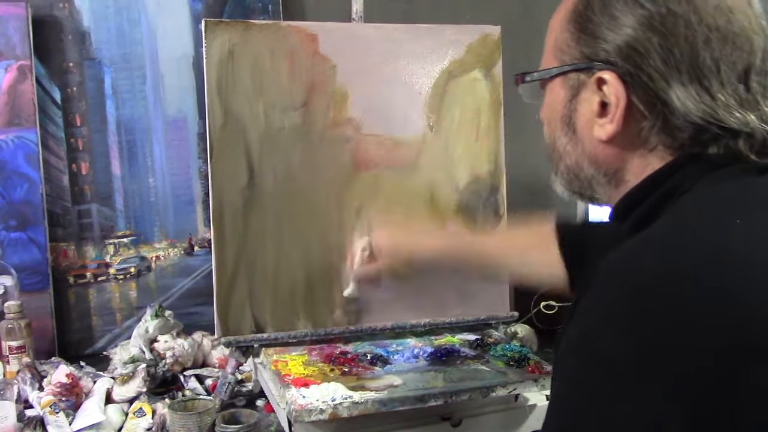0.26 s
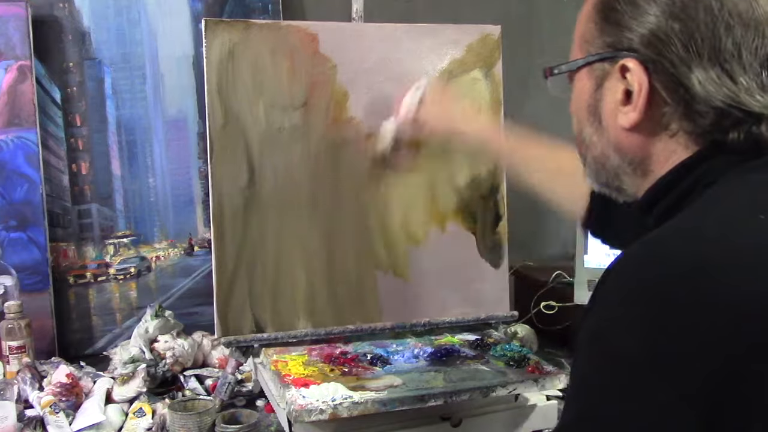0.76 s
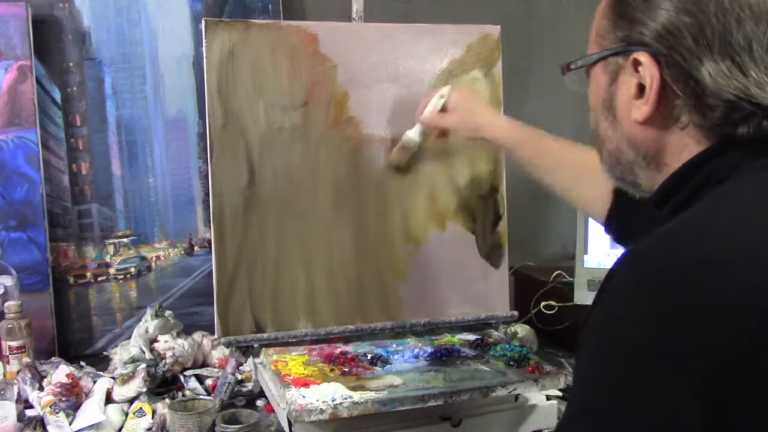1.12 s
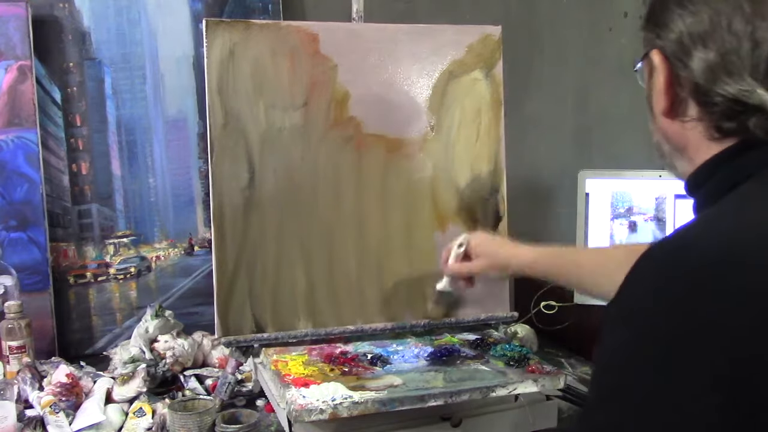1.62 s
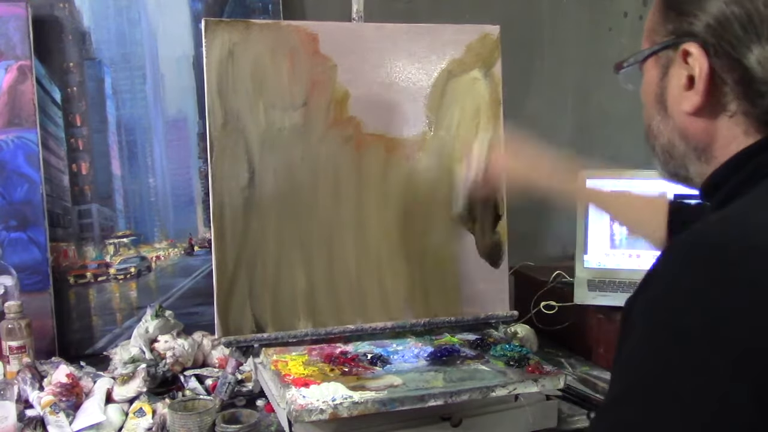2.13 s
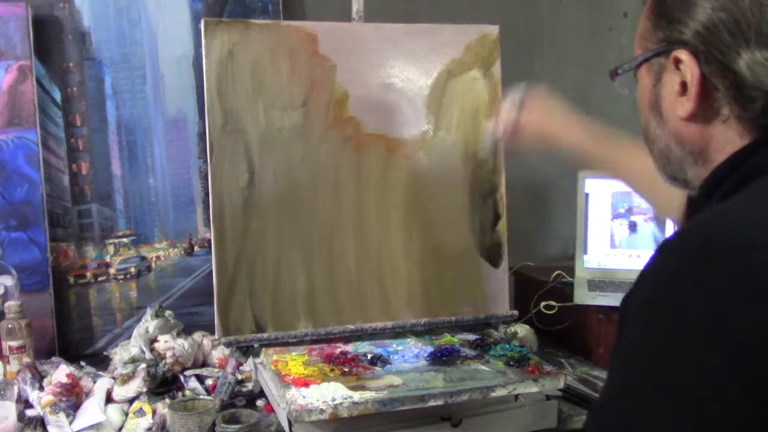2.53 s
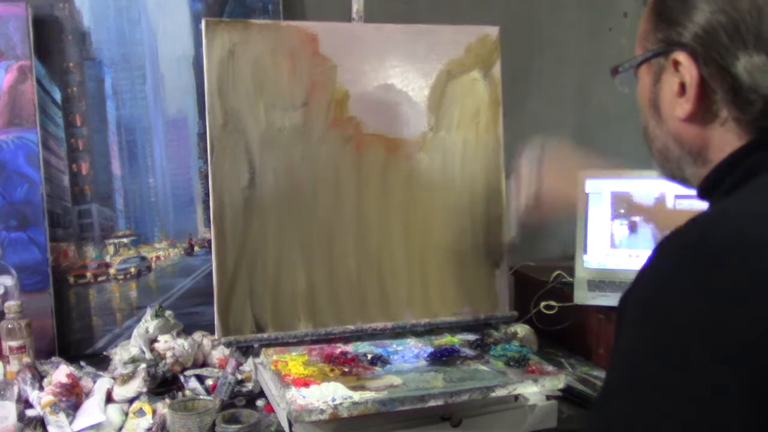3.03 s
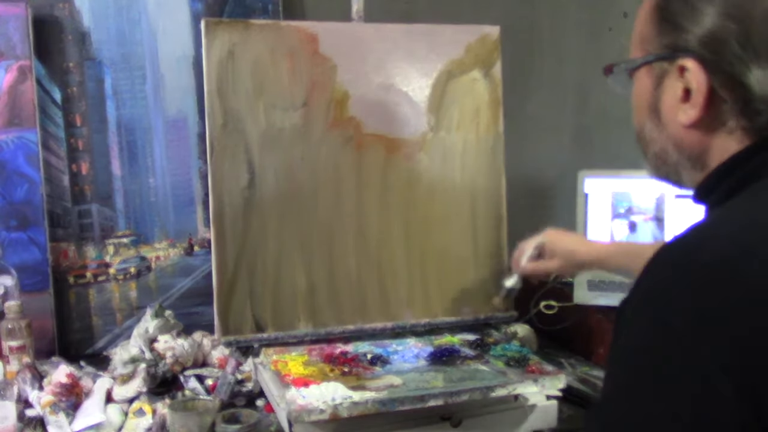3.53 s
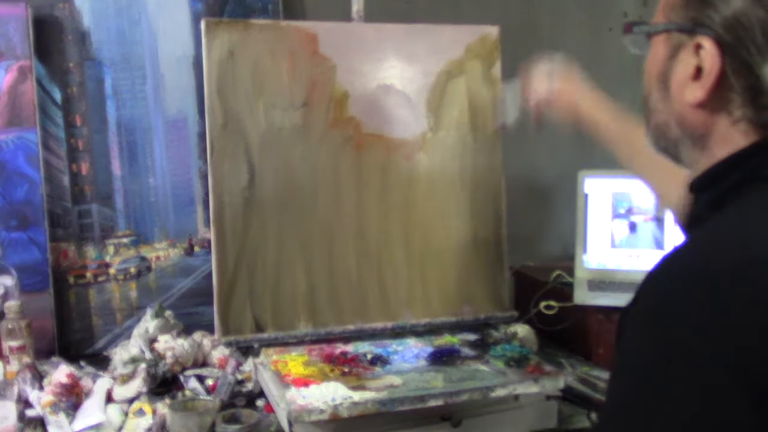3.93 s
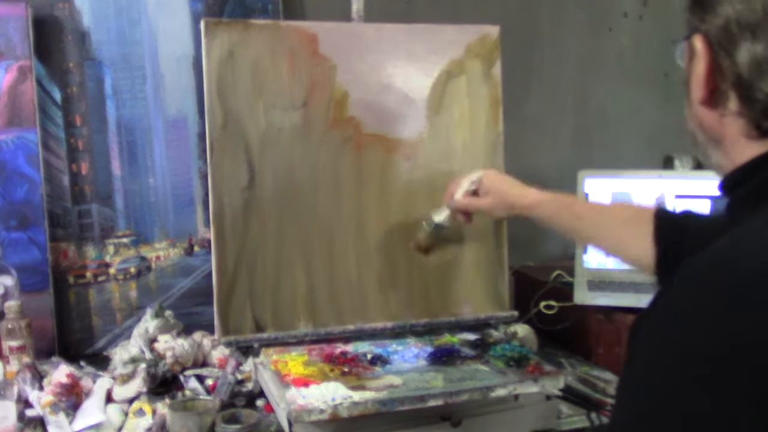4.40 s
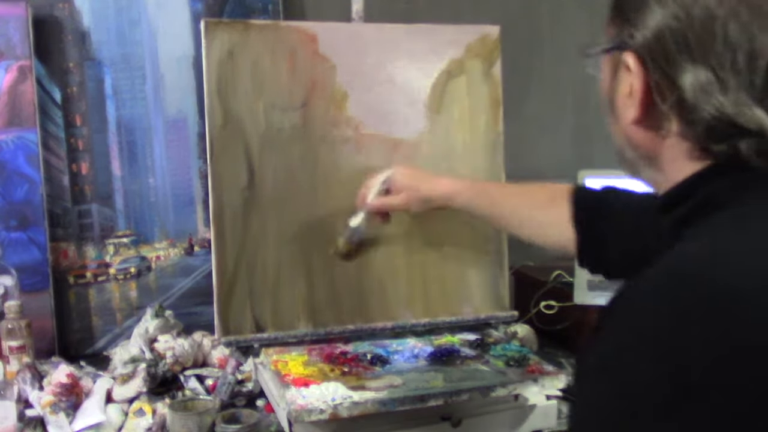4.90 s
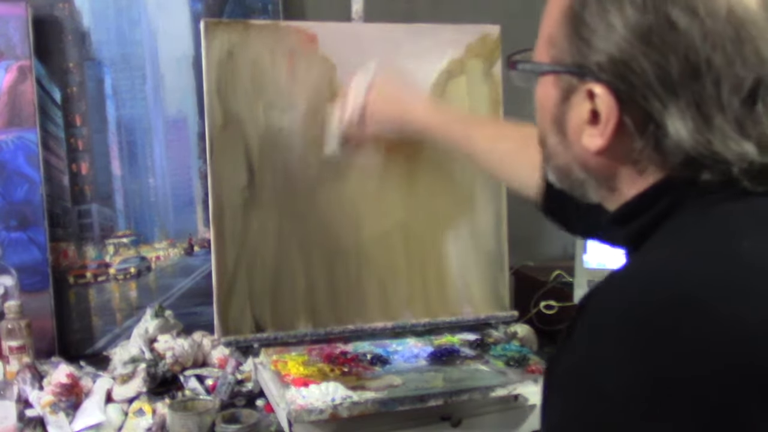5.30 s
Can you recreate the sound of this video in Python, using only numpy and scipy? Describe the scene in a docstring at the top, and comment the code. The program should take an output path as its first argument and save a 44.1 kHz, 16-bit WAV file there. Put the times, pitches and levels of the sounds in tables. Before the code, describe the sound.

Close in a quiet studio, a wide bristle brush scrubs stretched canvas, about six swishing strokes a second. Each stroke hisses and scrapes with a faint whine over hollow canvas drumming. Wooden knocks cluster near two and three seconds; then the scrubbing turns drier, lighter and softer to the end.

```python
"""In a studio, close microphones, nearly mono: a wide bristle brush scrubs thick paint on a stretched canvas.
From the start it goes up and down about six strokes a second: bristle slips hiss, scrape and fizz, the weave
whines with the speed of each stroke, the canvas drums underneath, and the easel rocks softly at the turns.
The ferrule knocks canvas against stretcher bar, hardest near 2 s and again near 3.1 s, as rung frame modes.
From about 2.8 s the scrape turns drier, then the strokes ease to a lighter scrub with one late knock."""
import sys
import numpy as np
from scipy import signal
from scipy.io import wavfile
from scipy.ndimage import uniform_filter1d

SR = 44100
rng = np.random.default_rng(int(sys.argv[2]) if len(sys.argv) > 2 else 0)


def unload_audio(sound):
    """Save the sound as a 16-bit wav file, at the path given as the first command line argument."""
    columns = np.transpose(np.atleast_2d(sound))
    # keep every value between -1 and 1, then stretch to whole-number steps
    steps = np.round(np.clip(columns, -1, 1) * 32767)
    wavfile.write(sys.argv[1], SR, steps.astype(np.int16))


N = 244755  # samples


def gain_of(db):
    """Decibels to amplitude."""
    return 10 ** (np.asarray(db) / 20)


def evened(x):
    """Scales to rms 1."""
    return x / np.sqrt(np.mean(x ** 2) + 1e-20)


def read(points, hz):
    """Reads a table on a log-frequency axis."""
    f, value = np.transpose(points)
    return np.interp(np.log(hz + 1), np.log(f + 1), value)


def add(mix, s, sound):
    """Mixes a sound in at s seconds."""
    part = mix[round(s * SR):][:len(sound)]
    part += sound[:len(part)]


def split(x, edge_hz):
    """Parts a sound, without delay, into what lies below and above edge_hz."""
    low = signal.sosfiltfilt(signal.butter(2, edge_hz, fs=SR, output="sos"), x)
    return low, x - low


def high_pass(x, edge_hz):
    """Takes away the bass below edge_hz."""
    return signal.sosfilt(signal.butter(2, edge_hz, "high", fs=SR, output="sos"), x)


def coloured(x, shape, peaks=(), patchy_db=0., size=512):
    """Gives x a spectrum, with resonant bumps and drifting patches; rms 1."""
    overlap = size - size // 4
    hz, _, z = signal.stft(x, SR, nperseg=size, noverlap=overlap)
    patches = uniform_filter1d(rng.standard_normal(z.shape), size=4, axis=0)
    patches = uniform_filter1d(patches, size=8, axis=1)
    bumps_db = sum(db / (1 + (2 * (hz - f) / width) ** 2) for f, width, db in peaks)
    level_db = read(shape, hz) + bumps_db
    z = z * gain_of(level_db[:, None] + patchy_db * evened(patches))
    return evened(signal.istft(z, SR, nperseg=size, noverlap=overlap)[1][:N])


def ring(modes, rise_s, phases):
    """Dying sines with a soft start, phases in turns; peak 1."""
    t = np.arange(8000) / SR
    x = sum(gain_of(db - 60 * t / t60) * np.sin(2 * np.pi * (hz * t + turns))
            for (hz, db, t60), turns in zip(modes, phases))
    x *= 1 - np.exp(-(t / rise_s) ** 2)
    return x / abs(x).max()


# Air of the studio at the microphones. Each row: frequency in Hz, density in dB per Hz.
AIR_MURMUR = [(25, -20), (60, -7), (200, 3), (500, 2.5), (900, -14.5), (1500, -34), (4000, -35.5)]
ROOM_TONE_DB = -62.5  # level of the part shared by both microphones


def room_tone():
    """A low murmur of air, partly unlike at the two microphones."""
    shared, apart = (coloured(rng.standard_normal(N), AIR_MURMUR, patchy_db=-1.5, size=2048)
                     for _ in range(2))
    return gain_of(ROOM_TONE_DB) * (shared + 0.66 * apart * np.array([[1], [-1]]))


# How fast the studio falls silent. Each row: frequency in Hz, decay by 60 dB in seconds.
ROOM_DECAY = [(200, 0.16), (1000, 0.35), (4000, 0.23), (12000, 0.062)]


def studio(x):
    """Reflections as taps of random sign, each band dying at its own speed."""
    taps = np.zeros((2, SR // 2))
    at = np.arange(200, SR // 2 - 20, 20)
    taps[:, at + rng.integers(0, 20, len(at))] = rng.choice([-1., 1.], (2, len(at)))
    hz, t, z = signal.stft(taps, SR, nperseg=256)
    # the microphones differ a little, and only in the bass
    z[1] = z[0] + (z[1] - z[0]) * 0.045 / (1 + (hz[:, None] / 600) ** 4)
    decay_db = -60 * t / read(ROOM_DECAY, hz)[:, None]
    tail = signal.istft(z * gain_of(decay_db), SR, nperseg=256)[1]
    return signal.fftconvolve(x[None], tail / np.linalg.norm(tail[0]), axes=1)[:, :N]


# Easel rocking as the arm turns at the foot of a stroke. Each row: start in seconds, peak in dB.
THUMPS = [(.28, -61), (.335, -62), (.622, -57), (.967, -55), (1.302, -58), (1.647, -56), (2.022, -57),
          (2.392, -59), (2.76, -64), (3.127, -58), (3.552, -62), (3.92, -66)]
# Modes of the easel. Each row: frequency in Hz, level in dB, decay by 60 dB in seconds.
EASEL_MODES = [(53, 4, 0.12), (95, -9, 0.083)]


def easel_thumps():
    """The rocking easel rings two low modes with a slow start."""
    out = np.zeros(N)
    for s, peak_db in THUMPS:
        add(out, s, gain_of(peak_db) * ring(EASEL_MODES, rise_s=.01, phases=[0, 0]))
    return out


# Blows on the stretcher bar. Each row: start in seconds, peak of the ringing in dB,
# frequency where the blow is strongest in Hz, crack in dB re that peak.
KNOCKS = [(.335, -25, 422, -15), (.632, -26.5, 463, -15), (1.036, -30, 363, -15), (1.628, -39, 574, -4),
          (1.638, -24.5, 620, -13), (1.645, -25, 428, -9), (1.657, -25, 376, -4), (2.0073, -23, 555, 7.5),
          (2.012, -22, 520, 7), (2.017, -13.5, 605, -8), (2.034, -20.5, 385, -4), (2.046, -26, 394, -3),
          (2.058, -32, 457, -12), (2.258, -31, 550, -20), (2.382, -28.5, 477, 11), (2.386, -23.5, 520, 0),
          (2.391, -16, 613, -10), (2.407, -23.5, 363, 0), (2.754, -24.5, 550, -7), (2.760, -22, 606, -5),
          (2.784, -25, 390, -7), (3.1152, -26, 470, 4), (3.118, -19.5, 493, 4), (3.124, -20, 650, -6),
          (3.135, -21.5, 415, -2), (3.142, -24.5, 426, 1), (3.155, -31, 500, -14), (3.559, -39, 450, -9),
          (3.584, -34, 296, -13), (4.366, -34.5, 560, -14)]
# Modes of canvas and bar. Each row: frequency in Hz, level in dB before the blow favours
# some of them, decay by 60 dB in seconds.
FRAME_MODES = [(270.5, 8.5, 0.04), (363, 2, 0.051), (446.5, 4, 0.03), (547, 3.5, 0.025), (597.5, 4, 0.031),
               (753, -4.5, 0.089), (933, 0, 0.14)]
# Ferrule on wood. Each row: frequency in Hz, level in dB, decay by 60 dB in seconds.
CRACK_MODES = [(1410, 2, 0.013), (1690, 4, 0.013), (2240, 7, 0.0091), (2730, -24, 0.01)]


def knocks():
    """Each knock rings the same frame, mostly the modes that move where it lands, with a short crack."""
    out = np.zeros(N)
    chances = rng.random((len(KNOCKS), len(FRAME_MODES)))
    for (s, peak_db, centre, crack_db), chance in zip(KNOCKS, chances):
        # a mode loses 40 dB at one octave from the centre of the blow
        modes = [(hz, db - 40 * np.log2(hz / centre) ** 2, t60) for hz, db, t60 in FRAME_MODES]
        add(out, s, gain_of(peak_db) * ring(modes, rise_s=0.0013, phases=0.34 * chance))
        add(out, s, gain_of(peak_db + crack_db) * ring(CRACK_MODES, rise_s=.0003, phases=chance))
    return high_pass(out, 200)  # an open canvas radiates little bass


# The brush on the canvas, one row a stroke, up and down in turn. Each row: start in seconds, pressed on
# in seconds, easing off in seconds, hiss at the turn in dB, hiss pressed in dB, hiss easing in dB,
# fastest at share of the stroke 0-1, threads crossed per second at the fastest in Hz, whine in dB re hiss
# before it swells with speed, mean scrape in dB re hiss, dryness that tilts the scrape to its treble in dB,
# mean canvas drumming in dB, canvas boom at the turn in dB, boom early in dB, boom late in dB,
# mean dry tip fizz in dB re hiss.
STROKES = [(-0.1, 0.005, 0.05, -51.0, -28.5, -31.5, 0.56, 2760, -12.5, -6, -3, -47, -51, -43, -60, -7),
           (0.124, 0.204, 0.24, -48, -28.0, -26.5, 0.63, 3740, -10.5, -4, -2, -40.5, -55, -47, -49, -6),
           (0.288, 0.33, 0.43, -46.0, -29, -35, 0.47, 2740, -9.5, -3.5, -1, -48, -44.5, -43.5, -56, -6),
           (0.475, 0.511, 0.59, -50, -34.5, -25.5, 0.61, 3820.0, -8, -2.5, -3, -41, -53, -50, -49, -4.5),
           (0.636, 0.66, 0.721, -42, -32, -28, 0.43, 2870, -14.5, -5, -1.5, -46.5, -46.5, -40.5, -51, -6),
           (0.821, 0.856, 0.928, -48.5, -33.5, -26, 0.64, 3960, -9.5, -3.5, -2, -42, -56, -52, -51.5, -7),
           (0.985, 1.016, 1.08, -41, -33, -32, 0.34, 2900, -13, -4, -1, -45, -48, -44, -49, -7),
           (1.16, 1.256, 1.299, -48.5, -27.0, -34.5, 0.53, 3860, -8.5, -3.5, -2, -42.5, -56, -49, -54, -5.5),
           (1.309, 1.316, 1.352, -40, -36, -28.5, 0.42, 2750, -18, -4.5, -1.5, -45, -45, -49, -58, -8),
           (1.495, 1.547, 1.613, -52.5, -36.0, -25.5, 0.6, 3630, -8.5, -3, -1, -43, -58, -58, -50, -4.5),
           (1.67, 1.703, 1.768, -43, -31.5, -33.0, 0.51, 2780, -12, -4.5, -1.5, -46.5, -45, -46, -61, -9),
           (1.871, 1.975, 1.99, -53, -27.5, -25.5, 0.58, 3850.0, -11.0, -2, -1.5, -42, -58, -47, -50, -6),
           (2.044, 2.065, 2.133, -41, -31.5, -29, 0.44, 2550.0, -14, -5.5, -2.5, -48, -38, -49.5, -69, -8.5),
           (2.241, 2.254, 2.353, -51, -40.5, -25.5, 0.56, 3300, -10, -2, -2.5, -41, -55, -46, -55, -7.5),
           (2.415, 2.421, 2.445, -42, -36, -26.5, 0.43, 2900, -13, -6, -0.5, -50, -40, -46.5, -60, -9),
           (2.592, 2.637, 2.706, -54.0, -39.5, -25.5, 0.55, 3850, -6.5, -1, 0.0, -46, -56, -46.5, -62, -7.5),
           (2.78, 2.809, 2.872, -42, -31, -28.0, 0.45, 3300, -24.0, -5, 1, -55, -41, -53, -59, -13),
           (2.965, 3.035, 3.106, -48, -30, -32, 0.58, 3360.0, -11.0, -2, 3.5, -53, -56, -61, -55, -10),
           (3.145, 3.177, 3.285, -45.0, -29.5, -35.5, 0.53, 3480, -16, -4, 2, -52.0, -37, -48.5, -60, -10.5),
           (3.353, 3.469, 3.54, -53.0, -27.5, -39, 0.47, 3180, -14, -3, 3.0, -53, -61, -58, -64, -14),
           (3.547, 3.614, 3.767, -50, -26, -38.5, 0.4, 3180, -14.5, -5.0, 1.0, -52.5, -47, -58, -65, -10),
           (3.826, 3.94, 4.01, -57, -36.0, -36, 0.71, 2740, -8.5, 0.5, -0.5, -53.5, -64, -63, -63, -6.0),
           (4.085, 4.128, 4.212, -49, -34.5, -41.5, 0.36, 2510, -12, -2, -1, -50.5, -54, -64, -64, -11),
           (4.247, 4.255, 4.349, -50, -54, -31.5, 0.55, 2790, -7.5, -1.5, 0, -47.5, -65, -65, -58, -6.5),
           (4.427, 4.457, 4.496, -47.5, -40, -39, 0.43, 2000.0, -25.0, -1, -1.5, -49, -65, -64, -59, -9),
           (4.52, 4.567, 4.617, -49.5, -37, -38.5, 0.6, 2280, -16, -1, -1.5, -47, -54, -61, -57, -6.5),
           (4.645, 4.666, 4.739, -46, -40, -35.5, 0.7, 2530, -11.5, -3.5, 0, -48, -53, -55, -50, -7),
           (4.773, 4.79, 4.878, -48, -41, -35.0, 0.57, 2580.0, -24.0, -2, -2, -46.5, -54, -59, -60, -7),
           (4.904, 4.94, 5.069, -47, -37, -37, 0.26, 2160, -18, -3, -2.5, -51.5, -52, -56, -60, -4.5),
           (5.179, 5.28, 5.325, -58, -34.5, -37.5, 0.57, 2950, -13, -2, -2.5, -50, -55, -56, -61, -2),
           (5.348, 5.389, 5.504, -46, -31.0, -39.5, 0.26, 2800, -15.0, -3.5, -1.5, -50.5, -52, -60, -57, -2.5)]
(START, PRESSED, EASING, TURN_DB, PRESSED_DB, EASING_DB, FASTEST, TOP_HZ, WHINE_DB, SCRAPE_DB,
 DRYNESS_DB, DRUM_DB, BOOM_TURN_DB, BOOM_EARLY_DB, BOOM_LATE_DB, FIZZ_DB) = np.transpose(STROKES)
LAST_TURN_S, LAST_TURN_DB = 5.56, -59
TURNS = np.append(START, LAST_TURN_S)
LENGTHS = np.diff(TURNS)  # s
PRESS_CURVE, EASE_CURVE = 1.01, 1.19  # powers of the rise and the fall of contact


def contact(t):
    """Stroke number, progress 0-1, hiss dB: press on, drag, ease off, never quite silent at the turn."""
    which = np.clip(np.searchsorted(TURNS, t, "right") - 1, 0, len(STROKES) - 1)
    a, b = TURNS[which], TURNS[which + 1]
    rise = np.clip((t - a) / (PRESSED[which] - a), 0, 1) ** PRESS_CURVE
    fall = np.clip((b - t) / (b - EASING[which]), 0, 1) ** EASE_CURVE
    drag_s = np.ravel([PRESSED, EASING], "F")
    drag_db = np.interp(t, drag_s, np.ravel([PRESSED_DB, EASING_DB], "F"))
    held = np.clip(t, PRESSED[which], EASING[which])  # level stays put while pressing on or easing off
    drag = gain_of(np.interp(held, t, drag_db)) * rise * fall
    rest = gain_of(np.interp(t, TURNS, np.append(TURN_DB, LAST_TURN_DB)))
    level = uniform_filter1d(np.hypot(drag, rest), size=300)
    return which, np.clip((t - a) / (b - a), 0, 1), 20 * np.log10(level)


def slips(per_s, spread_db):
    """Bristles letting go of the weave: dense random clicks, of more uneven size as spread_db grows."""
    size = gain_of(spread_db * np.minimum(rng.exponential(1, N), 5))
    return size * rng.standard_normal(N) * (rng.random(N) < per_s / SR)


def smooth(db):
    """Rounds off the steps of a level curve."""
    return uniform_filter1d(db, size=600)


def drift(up_down_db, which, progress):
    """Level change along a stroke, centred on its middle: (going up dB, going down dB) end to end."""
    return np.take(up_down_db, which % 2) * (progress - .5)


# Skin of the canvas under the bristles. Each row: frequency in Hz, density in dB per Hz.
DRUM_SPECTRUM = [(60, -45), (250, -28), (420, -6.5), (520, 3.5), (620, -1), (780, 3), (1000, -6.5),
                 (1600, -35)]
# Deeper boom of the canvas. Each row: frequency in Hz, density in dB per Hz.
BOOM_SPECTRUM = [(25, -49), (55, -12), (100, -16), (160, -5.5), (220, -4.5), (360, -1.5), (450, -3),
                 (700, -38.5)]
# Shares of the stroke, 0-1, at which the three boom levels are given.
BOOM_AT = (0, .35, .7)
DRUM_DRIFT, DRUM_FOLLOW = (-2.5, -2.5), 0.13  # dB up and down; share of the hiss swell followed
DRUM_DIP_DB, DRUM_DIP_S = -6, 0.011  # brief dip around each turn, before smoothing


def canvas_drumming(t, which, progress, swell_db):
    """The rubbed canvas drums as slips through its resonances, over a boom of shaped noise."""
    from_turn = np.minimum(progress, 1 - progress) * LENGTHS[which]
    dip_db = DRUM_DIP_DB * np.exp(-(from_turn / DRUM_DIP_S) ** 2)
    drum_db = DRUM_DB[which] + drift(DRUM_DRIFT, which, progress) + DRUM_FOLLOW * swell_db + dip_db
    boom_s = np.ravel(START + np.outer(BOOM_AT, LENGTHS), "F")
    boom_points_db = np.ravel([BOOM_TURN_DB, BOOM_EARLY_DB, BOOM_LATE_DB], "F")
    boom_db = np.interp(t, boom_s, boom_points_db)
    drum = coloured(slips(per_s=8000, spread_db=2.5), DRUM_SPECTRUM, patchy_db=3.5, size=2048)
    boom = coloured(rng.standard_normal(N), BOOM_SPECTRUM, patchy_db=1.0, size=2048)
    return gain_of(smooth(drum_db)) * drum + gain_of(smooth(boom_db)) * boom


def resonate(x, hz, width_hz):
    """Shifts the curve hz down to zero, smooths, and shifts back: a moving resonance."""
    turn = np.exp(2j * np.pi * np.cumsum(hz) / SR)
    r = np.exp(-np.pi * width_hz / SR)
    return 2 * (turn * signal.lfilter([1 - r], [1, -r], x / turn)).real


def weave_whine(t, which):
    """Threads crossed by the bristles whine at a pitch and level that follow the speed of the hand."""
    # the hand swings like a pendulum: speed rises and falls as a sine arch between the turns
    fastest_s = START + np.clip(FASTEST, .1, .9) * LENGTHS
    knots = np.append(np.ravel([START, fastest_s], "F"), LAST_TURN_S)
    arch = abs(np.sin(np.pi / 2 * np.interp(t, knots, np.arange(len(knots)))))
    hz = TOP_HZ[which] * np.maximum(arch, .1) ** 1.08
    threads = resonate(rng.standard_normal(N), hz, width_hz=300)
    threads = resonate(threads, hz, width_hz=450)
    return gain_of(WHINE_DB[which]) * (0.61 + 1.19 * arch ** 3) * evened(threads)


# Slips heard close up as hiss. Each row: frequency in Hz, density in dB per Hz.
HISS_SPECTRUM = [(100, -57), (600, -33), (1500, -23), (3000, -12.5), (4500, -4.5), (7000, -1.5), (9500, -3),
                 (12000, -12.5), (15600, -20)]
# Rougher scrape of the slips. Each row: frequency in Hz, density in dB per Hz.
SCRAPE_SPECTRUM = [(100, -48), (400, -22.5), (900, -5.5), (1400, -0.5), (2200, -4), (3300, 1.5), (4200, 0),
                   (5500, -4), (8000, -24)]
# Fizz of the dry tips. Each row: frequency in Hz, density in dB per Hz.
FIZZ_SPECTRUM = [(1000, -55), (8000, -22), (10500, 0), (12000, -1), (14000, -6), (15700, -9.5)]
# Resonances of the bristles, in hiss and scrape. Each row: frequency in Hz, width in Hz, boost in dB.
BRISTLE_PEAKS = [(1510, 230, 0), (1830, 82, 2), (2160, 210, 5), (2630, 300, 3), (3690, 110, 2.5),
                 (6900, 830, 0)]
SCRAPE_DRIFT, FIZZ_DRIFT = (1.9, 1.2), (8.4, -4.5)  # dB, going up and going down
SCRAPE_HOLD, FIZZ_HOLD = 0.19, 0.028  # share of the hiss swell that a layer ignores
# harder strokes are brighter: the top treble outgrows the hiss, and is unchanged at AIR_EVEN_DB
AIR_HZ, AIR_DB_PER_DB, AIR_EVEN_DB = 12600, 0.08, -32.5


def bristle_slips(which, progress, hiss_db, swell_db):
    """Bristles let go of the weave as clicks, coloured into hiss, scrape and fizz; levels re the hiss."""
    scrape_db = SCRAPE_DB[which] + drift(SCRAPE_DRIFT, which, progress) - SCRAPE_HOLD * swell_db
    fizz_db = FIZZ_DB[which] + drift(FIZZ_DRIFT, which, progress) - FIZZ_HOLD * swell_db
    hiss = coloured(slips(per_s=20000, spread_db=0.0), HISS_SPECTRUM, BRISTLE_PEAKS, patchy_db=2.0)
    scrape = coloured(slips(per_s=15000, spread_db=0.5), SCRAPE_SPECTRUM, BRISTLE_PEAKS, patchy_db=2.0)
    fizz = coloured(slips(per_s=20000, spread_db=2.0), FIZZ_SPECTRUM, patchy_db=-1.0)
    dull, bright = split(scrape, 2400)
    dryness = gain_of(smooth(DRYNESS_DB[which]))
    scrape = dull / dryness + bright * dryness
    layers = hiss + gain_of(smooth(scrape_db)) * scrape + gain_of(smooth(fizz_db)) * fizz
    body, air = split(layers, AIR_HZ)
    return body + air * gain_of(AIR_DB_PER_DB * (hiss_db - AIR_EVEN_DB))


def brush():
    """Slips and whine swell with the contact of each stroke, over the drumming canvas."""
    t = np.arange(N) / SR
    which, progress, hiss_db = contact(t)
    swell_db = hiss_db - np.maximum(PRESSED_DB, EASING_DB)[which]
    rubbing = bristle_slips(which, progress, hiss_db, swell_db) + weave_whine(t, which)
    return gain_of(hiss_db) * rubbing + canvas_drumming(t, which, progress, swell_db)


def scene():
    """Brush, knocks and rocking easel, a little room, room tone."""
    easel = brush() + knocks() + easel_thumps()
    return easel + gain_of(-12) * studio(easel) + room_tone()


EDGE_HZ = 15750  # top of the recorder's band


def record(dry):
    """Small microphones lose the deep bass; then the band limit of the recorder."""
    thin = high_pass(dry, 42)
    band = signal.firwin(2047, EDGE_HZ, window=("kaiser", 10), fs=SR)
    return signal.oaconvolve(thin, band[None], "same")


dry = scene()
out = record(dry)
unload_audio(out)
```